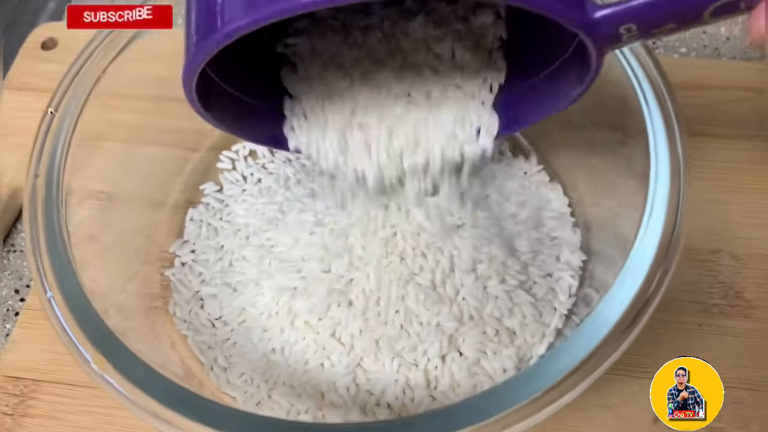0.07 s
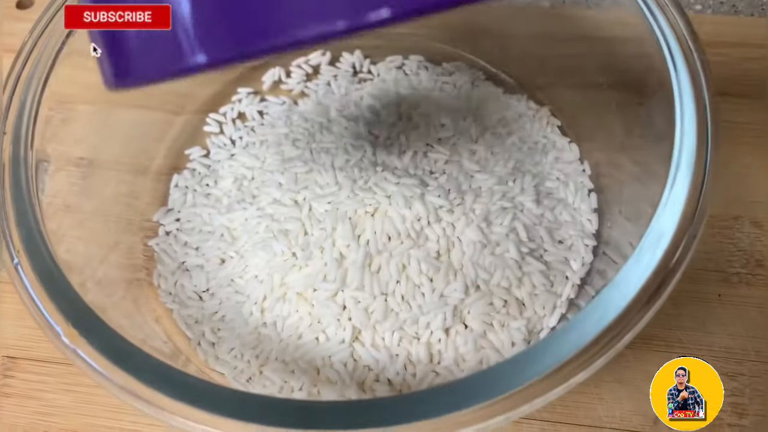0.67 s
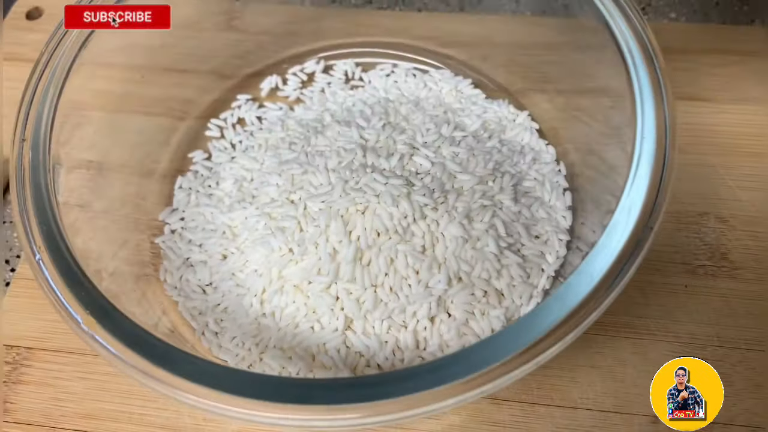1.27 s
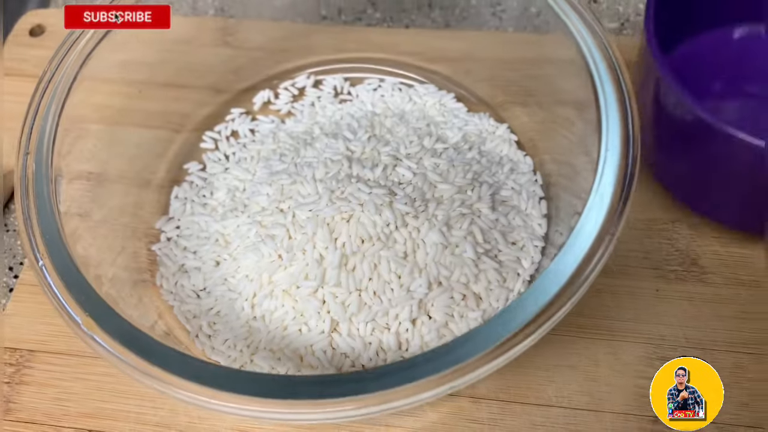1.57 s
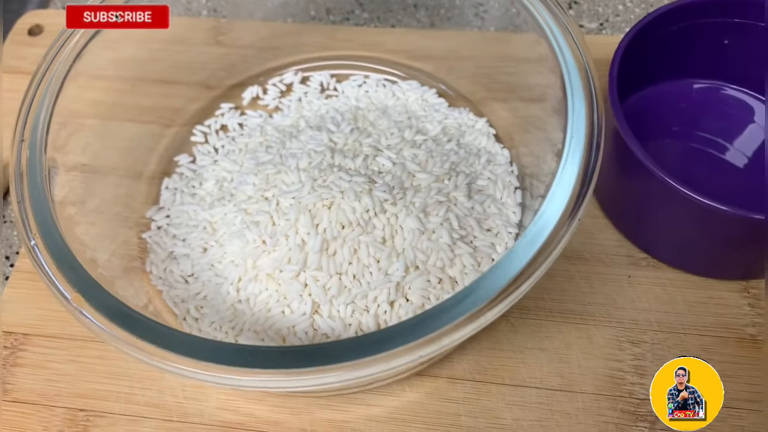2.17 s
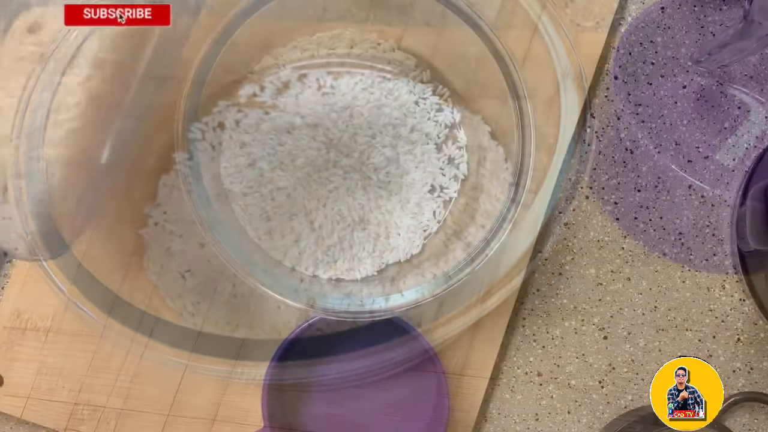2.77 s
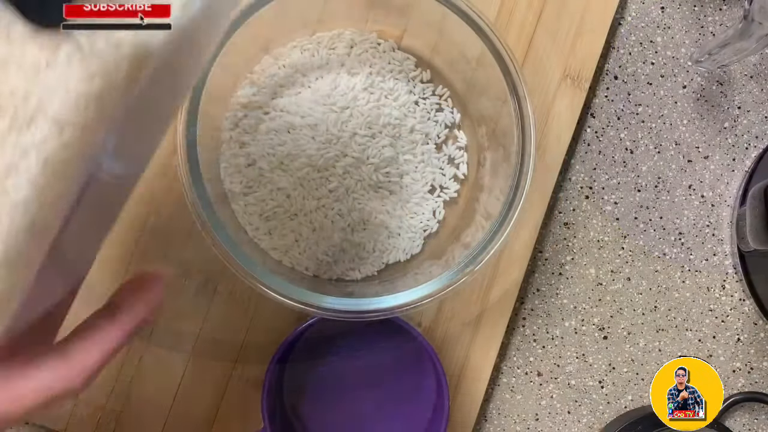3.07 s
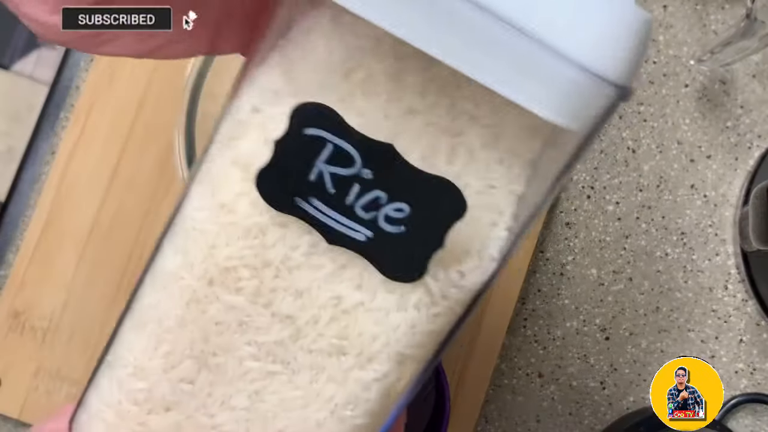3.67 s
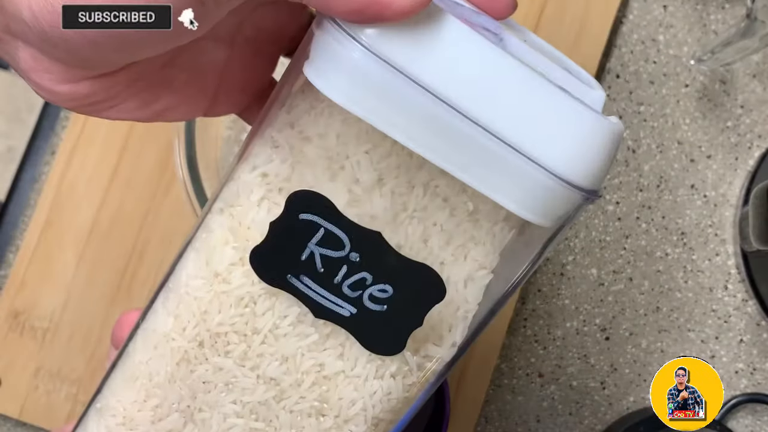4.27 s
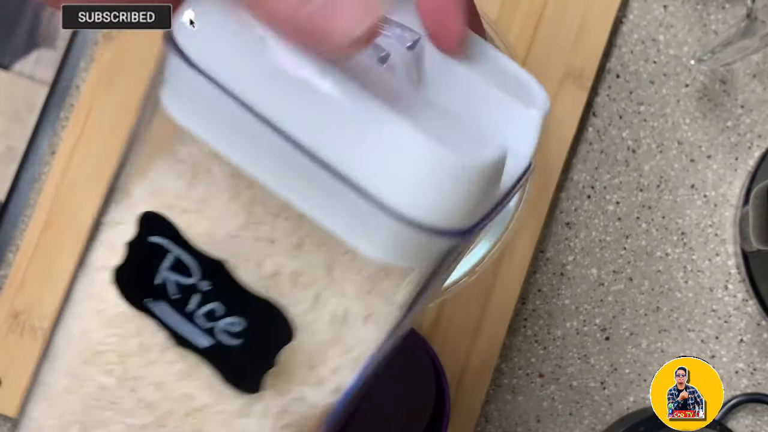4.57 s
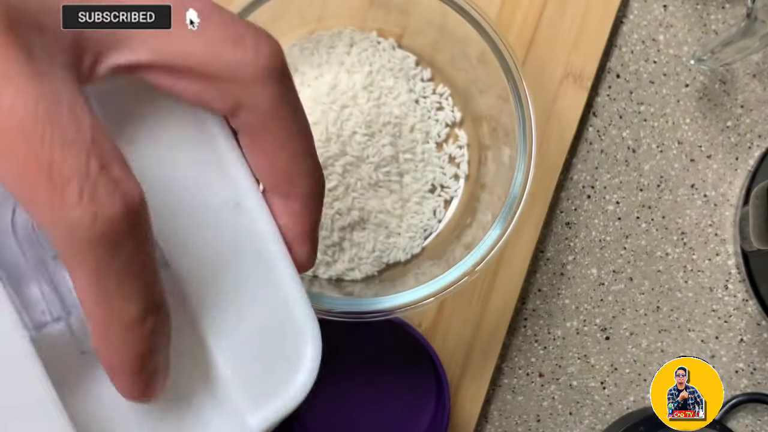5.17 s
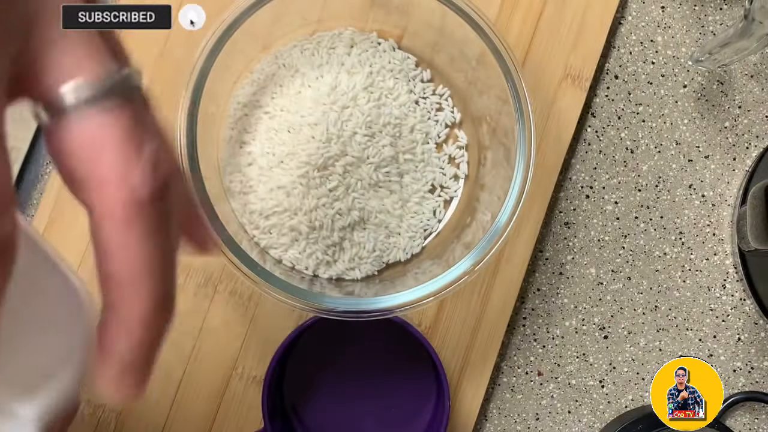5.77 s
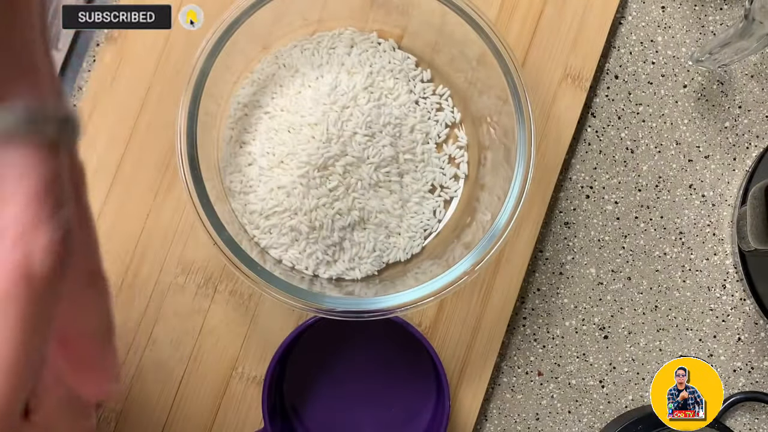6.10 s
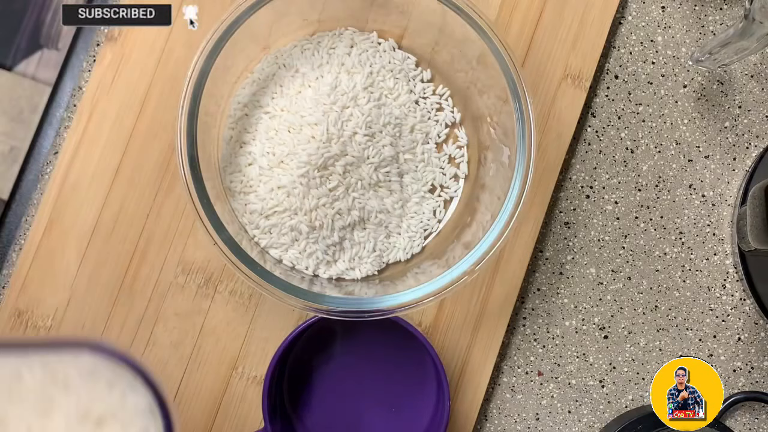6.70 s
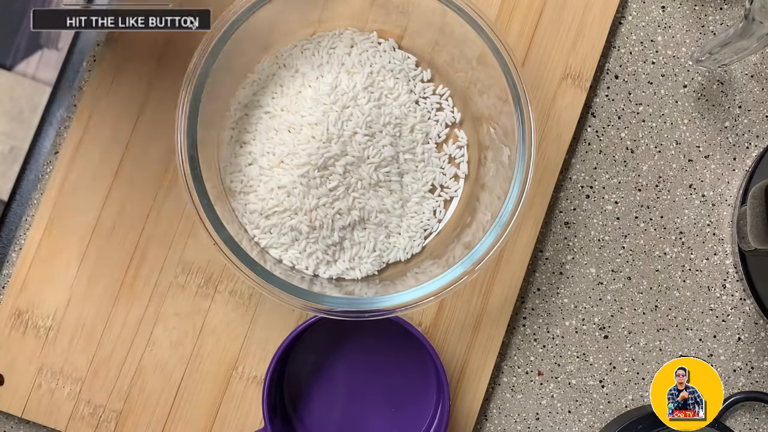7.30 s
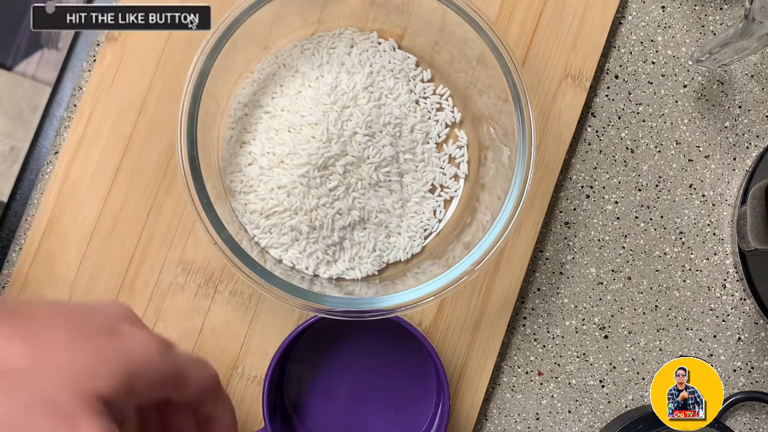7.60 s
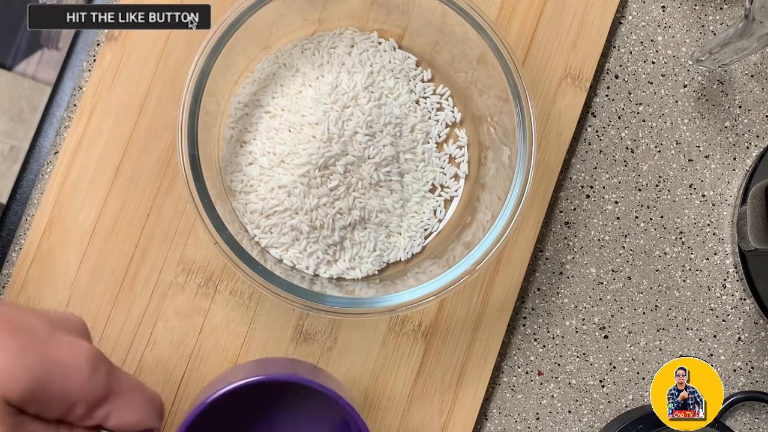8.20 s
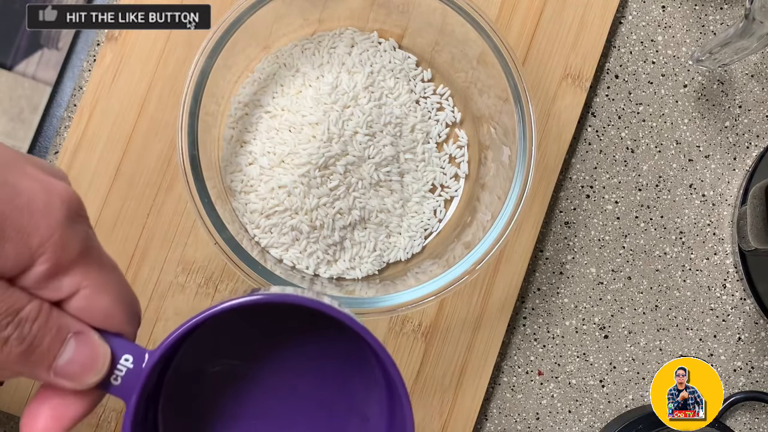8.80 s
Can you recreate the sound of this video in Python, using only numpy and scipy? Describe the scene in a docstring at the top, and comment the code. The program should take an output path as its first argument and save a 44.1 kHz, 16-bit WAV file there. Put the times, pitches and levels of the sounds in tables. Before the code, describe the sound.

Dry rice hisses into a glass bowl, then a plastic cup and canister knock and clatter, and more rice slides, in a quiet kitchen.

```python
"""Dry rice pours from a plastic measuring cup into a glass bowl, pattering and ringing the glass.
The cup is tapped and set down on a stone counter, where it totters. A plastic canister is lifted,
rice slipping along its wall, and put down; its lid is laid aside. Last, the cup knocks hollowly on
a wooden board as it is picked up, and the rice slides again. A small kitchen rumbles low throughout."""
import sys
import numpy as np
from scipy import signal
from scipy.fft import rfft, irfft
from scipy.io import wavfile

SR = 44100
rng = np.random.default_rng(int(sys.argv[2]) if len(sys.argv) > 2 else 0)


def transcribe(signal):
    """Save signal, clipped to [-1, 1], as a 16-bit WAV file at the path in sys.argv[1]."""
    frames = np.atleast_2d(signal).T
    limited = np.clip(frames, -1, 1)
    pcm = np.round(limited * 32767).astype(np.int16)
    wavfile.write(sys.argv[1], SR, pcm)


N = 399105

BOWL_LAG_SAMPLES, CANISTER_LAG_SAMPLES = -6.7, 13.1  # a positive lag puts the left ear behind the right, a negative one ahead of it

# Single grains landing. Each row: start in seconds, level in dB.
POUR_GRAINS = [(0.079, -31.5), (0.105, -29), (0.124, -30.5), (0.374, -32.5), (0.415, -32), (0.478, -39.5),
               (0.926, -68)]
# Rice patter. Each row: frequency in Hz, level in dB.
PATTER_SPECTRUM = [(200, -30.5), (450, -29), (800, -13), (1500, -12.5), (2500, -14.5), (4600, -10),
                   (6000, -6), (7000, -3.5), (8800, 4), (9700, -19.5), (10800, 7), (12500, 1.5), (14000, 0),
                   (15500, -17)]
# Glass bowl. Each row: frequency in Hz, level in dB, T60 in seconds.
BOWL_MODES = [(780, -9.5, 0.055), (1518, -15, 0.1), (2887, -3, 0.035), (3630, -10, 0.025),
              (4330, -4.5, 0.037), (5415, 2.5, 0.01), (6556, 9, 0.028), (6940, 11.5, 0.021),
              (8150, 2.5, 0.015)]


def pour():
    """A swelling stream of grains rings the glass; the last trickle only patters on the heap."""
    stream_end_s, stream_db_per_s, glass_db_per_s = 0.3975, 4.5, 8
    start_s, db = np.transpose(POUR_GRAINS)
    left_s = np.maximum(stream_end_s - np.arange(N) / SR, 0)
    stream = amp(-41.5 - stream_db_per_s * left_s) ** 2 * swell(0, stream_end_s, rise_s=1, stop_s=0.0094)
    trickle = amp(-53) ** 2 * swell(0, hold_s=0.53, rise_s=1, stop_s=0.07)
    hits = grains(np.sqrt(stream + trickle), per_s=1800, spread_db=1.5, t60_s=0.0049)
    hits += bursts(impulses(start_s, amp(db)), t60_s=0.0098)
    patter = amp(-1) * colour(hits, PATTER_SPECTRUM)
    on_glass = hits * np.sqrt(stream / (stream + trickle))
    glass = amp(-3.5 - glass_db_per_s * left_s) * through(on_glass, unit(ringing(BOWL_MODES)))
    return arrive(patter + glass, BOWL_LAG_SAMPLES), amp(-6.5) * patter + amp(-8) * glass


# Sharp ticks on the canister wall: single grains striking it, and at 3.05 s a light tap on the canister itself.
# Each row: start in seconds, level in dB.
WALL_TICKS = [(3.053, -43.5), (3.1366, -53), (3.284, -46.5), (3.687, -47), (3.7928, -34.5), (3.812, -31),
              (3.9417, -31.5), (4.083, -40), (4.504, -33), (4.583, -40), (5.0431, -39.5), (5.648, -36),
              (5.764, -34), (7.145, -56.5), (7.284, -52.5), (7.429, -56), (7.673, -35), (7.772, -37),
              (7.803, -27), (7.815, -30), (7.96, -34), (7.991, -31), (8.1676, -28), (8.21, -25),
              (8.272, -27.5), (8.4045, -25), (8.459, -30.5), (8.51, -33), (8.5649, -25), (8.6499, -29),
              (8.6849, -31), (8.709, -26), (8.8439, -23.5), (8.8766, -30), (8.935, -27), (8.957, -22)]
# Slips as the canister tips. Each row: start and hold in seconds, level in dB, rise in seconds.
RICE_SLIPS = [(3.098, 0.049, -58.5, 0.025), (3.264, 0.019, -63, .015), (3.435, 0.021, -67.5, 0.034),
              (3.684, 0.14, -60.5, 0.0055), (3.818, .17, -56, 0.0087), (4.075, 0.014, -62, .01),
              (4.48, 0.014, -50, 0.032), (4.591, 0.026, -58, 0.014), (4.623, 0.23, -70, .03),
              (4.965, 0.036, -54.5, 0.026), (5.19, 0.014, -64, 0.043), (5.334, .24, -64, 0.041),
              (5.61, 0.072, -50.5, 0.018), (5.723, 0.19, -61.5, 0.028), (7.676, 0.029, -46, .003),
              (7.795, 0.025, -67, 0.028), (7.945, .12, -61, 0.04)]
# Flow of the last slide. Each row: time in seconds, level in dB.
LONG_SLIDE = [(8.12, -43), (8.266, -41.5), (8.36, -43), (8.395, -48.5), (8.42, -44), (8.62, -48),
              (8.645, -50.5), (8.70, -46.5), (8.82, -45), (8.855, -39), (8.92, -45.5), (8.97, -44),
              (9.05, -47)]
# Grain hiss and wall wash. Each row: frequency in Hz, level in dB.
HISS_SPECTRUM = [(200, -47), (500, -32.5), (1000, -19.5), (2500, -18), (4400, -13.5), (6000, -10.5),
                 (8000, -4), (10300, 0), (13300, 4), (14500, 3), (16000, -4.5)]
WASH_SPECTRUM = [(400, -19.5), (1000, -2.5), (2500, -7), (3600, -4.5), (4500, 5.5), (5600, -1), (7600, 1),
                 (8600, -10), (12000, -6.5), (16000, -19)]
# Canister hollow. Each row: frequency in Hz, level in dB, T60 in seconds.
HOLLOW_MODES = [(238.3, -13, 0.24), (983, 9, 0.06), (4150, -11, 0.0039)]


def slide():
    """Rice slips along the canister wall in little avalanches and stirs its hollow body."""
    clumps_per_s, clump_db, wash_t60_s = 60, 2.5, 0.068
    slip_power = sum(amp(db) ** 2 * swell(start_s, hold_s, rise_s, stop_s=0.025)
                     for start_s, hold_s, db, rise_s in RICE_SLIPS)
    flow = np.sqrt(slip_power) + amp(0.5) * gain_curve(LONG_SLIDE)
    clump_index = np.arange(N) / SR * clumps_per_s
    clumps = amp(clump_db * np.interp(clump_index, np.arange(2000), rng.standard_normal(2000)))
    hits = amp(-1.5) * grains(flow * clumps, per_s=1700, spread_db=3.5, t60_s=0.0057)
    tick_s, tick_db = np.transpose(WALL_TICKS)
    ticks = amp(-7.5) * bursts(impulses(tick_s, amp(tick_db)), t60_s=0.014)
    hiss = colour(hits + ticks, HISS_SPECTRUM)
    # Hits all over the wall blur into a wash; its share grows with the flow.
    on_wall = hits * (flow / flow.max()) ** 0.1 + amp(-3) * ticks
    wall = np.array([bursts(on_wall, wash_t60_s) for _ in range(2)])
    wash = amp(-11) * colour(wall, WASH_SPECTRUM) / np.linalg.norm(fade(wash_t60_s))
    hollow = amp(-25.5) * through(hits + ticks, unit(ringing(HOLLOW_MODES)))
    return arrive(hiss + amp(-9.5) * hollow, CANISTER_LAG_SAMPLES) + wash, amp(-1.5) * hiss + hollow


# Plastic bodies. Each row: frequency in Hz, level in dB, T60 in seconds.
CUP_MODES = [(584.7, -14, 0.051), (812, -8.5, 0.1), (1222, -4, 0.1), (1393, -3, 0.075), (1507, 0.5, 0.15),
             (1690, -9, 0.13), (1960, -2.5, 0.14), (2110, 1, 0.25), (2175, -5.5, 0.15), (2260, -8, 0.067),
             (2780, -13, 0.11), (3700, -17.5, 0.05), (4380, -18.5, .09), (5220, -16, .06)]
CANISTER_MODES = [(348.4, -13, 0.032), (445.6, -1, 0.042), (601.5, -3.5, 0.065), (779, -21, 0.033),
                  (1106, -5.5, 0.05), (2280, -5, 0.08), (2618, -8.5, 0.037), (3390, -10.5, 0.033)]
# Their contact noise. Each row: frequency in Hz, level in dB.
CUP_DOWN_SPECTRUM = [(150, -36), (450, -30), (800, -13), (1500, 6), (2100, 1.5), (2800, -5), (4000, -15.5),
                     (8000, -41)]
CANISTER_SPECTRUM = [(100, -15), (300, -8.5), (550, 7.5), (900, 2.5), (1500, 0.5), (2400, 2), (4000, -7),
                     (8000, -46)]
CUP_UP_SPECTRUM = [(150, -9), (500, -17), (900, 0), (1300, 2.5), (2100, 2), (2800, -7), (4000, -20),
                   (8000, -40)]
# Blows. Each row: start in seconds, level in dB, wall pitch in Hz, clack in dB re that level,
# then thud, crack and surface ring in dB.
CUP_DOWN_KNOCKS = [(0.5572, -29, 1398, -12, -58, -30.5, -65.5), (0.8681, -51, 1448, -2, -70, -70.5, -83),
                   (1.4162, -19, 1948, 1.5, -70, -22, -82), (1.4265, -22, 2900, -1, -77.5, -28.5, -84),
                   (1.7656, -23, 1380, 14, -36, -65.5, -49), (1.8274, -8, 2068, 1, -20, -35.5, -34.5),
                   (2.0141, -15, 2050, -1, -33, -27, -40.5), (2.028, -23.5, 2053, 7.5, -49, -41.5, -58),
                   (2.054, -25, 1973, 10.5, -31, -38, -38), (2.065, -22, 1558, 6.5, -39.5, -27, -50.5),
                   (2.168, -24.5, 2140, 13, -45, -41.5, -54.5), (2.2422, -34, 1956, 4.5, -42, -44, -57),
                   (2.2629, -33, 2154, 6.5, -58.5, -49, -52.5)]
CANISTER_KNOCKS = [(3.052, -59, 2100, -2, -86.5, -56, -91), (3.188, -59.5, 1473, -9, -87, -63.5, -90.5),
                   (5.8105, -24, 460.2, 5.5, -22.5, -30, -34), (5.8208, -24, 572.7, -6, -42, -21, -55),
                   (5.8393, -13, 435.3, -6.5, -21.5, -17, -38), (6.096, -37, 634, -2.5, -45, -45.5, -64.5),
                   (6.148, -40, 642.7, 1.5, -45.5, -54, -74), (6.8735, -20.5, 842, -3.5, -48, -53.5, -56),
                   (6.933, -22.5, 900, -4, -43.5, -82.5, -62)]
CUP_UP_KNOCKS = [(7.746, -51, 1560, 6, -46.5, -53, -73), (7.782, -45, 2500, -6, -50, -54.5, -38),
                 (7.81, -45, 1530, -12, -49, -47.5, -67), (7.847, -38, 1300, -10, -33.5, -42, -62),
                 (7.858, -33.5, 1490, -2, -30.5, -67, -28.5), (7.874, -12, 1230, -7, -36, -62, -45),
                 (7.877, -36, 2625, 2.5, -44, -60, -42), (8.07, -13, 1855, -15, -36, -31.5, -56),
                 (8.1035, -19, 1138, -13, -37, -44, -57), (8.111, -28.5, 1570, 0, -31.5, -63, -31)]


def plastic_knocks():
    """Hard contacts: the cup tapped and set down, canister and lid put down, the cup picked up."""
    cup_down = blows(CUP_DOWN_KNOCKS, CUP_MODES, CUP_DOWN_SPECTRUM, BOWL_LAG_SAMPLES, pan_db=-1.5,
                     rise_s=0.00043, wall_t60_s=0.022, ring_db=-24.5, body_db=-9.5, body_t60_s=0.018,
                     thud_db=0.5, thud_t60_s=0.053, low_hz=136, crack_db=3, crack_t60_s=0.017,
                     room_db=-1)
    canister = blows(CANISTER_KNOCKS, CANISTER_MODES, CANISTER_SPECTRUM, CANISTER_LAG_SAMPLES, pan_db=2,
                     rise_s=0.00029, wall_t60_s=0.033, ring_db=-20, body_db=-9, body_t60_s=0.025,
                     thud_db=-2, thud_t60_s=0.07, low_hz=45, crack_db=2, crack_t60_s=0.0035,
                     room_db=-4.5)
    cup_up = blows(CUP_UP_KNOCKS, CUP_MODES, CUP_UP_SPECTRUM, CANISTER_LAG_SAMPLES, pan_db=1,
                   rise_s=0.00005, wall_t60_s=0.1, ring_db=-26.5, body_db=1, body_t60_s=0.014,
                   thud_db=-5.5, thud_t60_s=0.12, low_hz=35.03, crack_db=8.5, crack_t60_s=0.043,
                   room_db=0)
    return mix(cup_down, canister, cup_up)


# Surface below. Each row: frequency in Hz, level in dB, T60 in seconds.
SURFACE_MODES = [(118, -6.5, 0.25), (129, -3, 0.14), (245.2, -1.5, 0.3), (281.3, -4, 0.15),
                 (325.4, -7.5, 0.2)]
# Surface thud and contact crack. Each row: frequency in Hz, level in dB.
THUD_SPECTRUM = [(35, -25.5), (70, -2.5), (120, 0), (250, 0), (450, -5.5), (800, -11), (1600, -33.5),
                 (4000, -61.5)]
CRACK_SPECTRUM = [(800, -30), (2500, -2), (3600, 0.5), (5000, -4.5), (6500, -2), (9000, -6.5),
                  (12000, -1.5), (14000, -7), (16000, -28.5)]


def blows(rows, modes, spectrum, lag_samples, pan_db, rise_s, wall_t60_s, ring_db, body_db, body_t60_s,
          thud_db, thud_t60_s, low_hz, crack_db, crack_t60_s, room_db):
    """The struck wall clacks, the body rings, the surface below thuds and the contact cracks."""
    start_s, db, wall_hz, wall_db, *contact_db = np.transpose(rows)
    body_hits, thud_hits, crack_hits, surface_hits = (impulses(start_s, amp(level))
                                                      for level in (db, *contact_db))
    # Each blow lands elsewhere, so it takes its own share of each mode.
    shape = len(start_s), len(modes)
    shares = rng.choice([-1, 1], shape) * amp(2 * rng.standard_normal(shape))
    rings = shares @ np.array([amp(level + ring_db) * mode(hz, t60_s) for hz, level, t60_s in modes])
    onset = 1 - fade(np.log(1000) * rise_s)  # plastic gives
    wall, ring = np.zeros((2, N))
    for k, start in enumerate(np.round(start_s * SR).astype(int)):
        span = slice(start, start + len(onset))
        wall[span] += amp(db[k] + wall_db[k]) * onset * mode(wall_hz[k], wall_t60_s)
        ring[span] += amp(db[k]) * rings[k]
    body = ring + amp(body_db) * colour(bursts(body_hits, body_t60_s, rise_s), spectrum)
    thud = amp(thud_db) * colour(bursts(thud_hits, thud_t60_s, rise_s=0.0012), THUD_SPECTRUM)
    bass_cut = signal.butter(2, low_hz, "high", fs=SR, output="sos")  # light things move little bass
    surface = signal.sosfilt(bass_cut, thud + through(surface_hits, ringing(SURFACE_MODES)))
    crack = amp(crack_db) * colour(bursts(crack_hits, crack_t60_s, rise_s), CRACK_SPECTRUM)
    direct = wall + surface + arrive(body, lag_samples / 2) + arrive(crack, lag_samples)
    feed = wall / 4 + body + crack + amp(-3) * surface  # the wall is heard mostly close by
    return panned(pan_db) * direct, panned(pan_db) * amp(room_db) * feed


# Cup rebounds. Each row: start in seconds, pitch in Hz, note and overtone in dB.
CUP_REBOUNDS = [(1.7672, 1537, -27.5, -53.5), (2.3683, 1636, -64, -64.5), (2.474, 1615, -69.5, -69.5),
                (7.746, 1524, -50, -47.5), (7.849, 1537, -46, -43), (7.875, 1497, -23.5, -50),
                (8.1055, 1420, -40, -42)]


def rebounds():
    """Clear of the surface, the cup's wall rings on with a note and one overtone."""
    out = 0
    for start_s, hz, db, overtone_db in CUP_REBOUNDS:
        note = amp(db) * mode(hz, t60_s=0.21) + amp(overtone_db) * mode(2.635 * hz, t60_s=0.17)
        out = out + np.pad(note, (int(start_s * SR), N))[:N]
    return arrive(out, 0), amp(-13) * out


# Soft taps. Each row: start in seconds, level in dB, wall pitch in Hz.
CUP_TOTTERS = [(2.3684, -46, 1890), (2.388, -55.5, 2100), (2.412, -51.5, 2010), (2.452, -62.5, 2050),
               (2.474, -62, 1403), (2.5196, -56, 1480), (2.5355, -59.5, 2100)]
CANISTER_TAPS = [(5.568, -39, 350), (5.608, -38.5, 367.5), (5.648, -37, 393), (5.657, -40.5, 348.8),
                 (5.677, -46.5, 262.7), (5.759, -38, 434.3), (5.803, -16, 351.5), (5.846, -17, 169.7),
                 (7.798, -25, 135)]


def plastic_taps():
    """The cup totters to rest; the canister is handled."""
    cup = taps(CUP_TOTTERS, CUP_MODES, BOWL_LAG_SAMPLES,
               rise_s=0.001, wall_t60_s=0.07, ring_db=-12, room_db=-13.5)
    canister = taps(CANISTER_TAPS, CANISTER_MODES, CANISTER_LAG_SAMPLES,
                    rise_s=0.0022, wall_t60_s=0.032, ring_db=-14, room_db=-7)
    return mix(cup, canister)


def taps(rows, modes, lag_samples, rise_s, wall_t60_s, ring_db, room_db):
    """A soft contact draws a short note from the wall and a faint ring from the body."""
    onset = 1 - fade(np.log(1000) * rise_s)
    out = 0
    for start_s, db, hz in rows:
        note = mode(hz, wall_t60_s) + amp(ring_db) * ringing(modes)
        out = out + np.pad(amp(db) * note * onset, (int(start_s * SR), N))[:N]
    return arrive(out, lag_samples), amp(room_db) * out


# Rim scuffs. Each row: start and hold in seconds, object and surface level in dB.
CUP_ROCKS = [(1.98, 0.3, -51, -53), (2.19, 0.049, -49.5, -47.5), (2.345, 0.032, -58, -74),
             (2.44, 0.1, -74, -90.5)]
CANISTER_DRAGS = [(5.625, 0.03, -59.5, -55), (5.73, 0.1, -59.5, -60), (6.03, 0.11, -64, -63.5),
                  (6.875, 0.066, -44, -50), (6.96, 0.048, -54.5, -41)]
CUP_DRAGS = [(7.68, 0.054, -49, -70.5), (7.745, 0.029, -47, -48.5), (7.785, 0.033, -44, -46),
             (7.86, 0.033, -44, -37), (7.95, .02, -54.5, -53), (8.02, 0.077, -52.5, -54.5)]


def plastic_scuffs():
    """The cup rocks on its rim; canister, lid and cup drag briefly."""
    cup_down = scuffs(CUP_ROCKS, CUP_MODES, CUP_DOWN_SPECTRUM, BOWL_LAG_SAMPLES,
                      per_s=630, ring_db=-7, body_db=-6.5, grit_db=-9.5)
    canister = scuffs(CANISTER_DRAGS, CANISTER_MODES, CANISTER_SPECTRUM, CANISTER_LAG_SAMPLES,
                      per_s=890, ring_db=-14, body_db=-4, grit_db=-19.5)
    cup_up = scuffs(CUP_DRAGS, CUP_MODES, CUP_UP_SPECTRUM, CANISTER_LAG_SAMPLES,
                    per_s=270, ring_db=-10.5, body_db=-6, grit_db=-9.5)
    return mix(cup_down, canister, cup_up)


def scuffs(rows, modes, spectrum, lag_samples, per_s, ring_db, body_db, grit_db):
    """A moving rim sends a stream of small contacts into the object and the surface below."""
    power = sum(amp([[db], [surface_db]]) ** 2 * swell(start_s, hold_s, rise_s=0.003, stop_s=0.029)
                for start_s, hold_s, db, surface_db in rows)
    on_object, on_surface = np.sqrt(power)
    touches = grains(on_object, per_s, spread_db=2.5, t60_s=0.032)
    presses = grains(on_surface, per_s, spread_db=-0.5, t60_s=0.019)
    ring = amp(ring_db) * through(touches, unit(ringing(modes)))
    body = ring + amp(body_db) * colour(touches, spectrum)
    grit = amp(grit_db) * colour(touches, CRACK_SPECTRUM)
    thud = amp(-3.5) * colour(presses, THUD_SPECTRUM)
    surface = thud + amp(-4.5) * through(presses, unit(ringing(SURFACE_MODES)))
    direct = surface + arrive(body, lag_samples / 2) + arrive(grit, lag_samples)
    return direct, amp(-8) * (body + grit) + amp(-9.5) * surface


# Hand on canister. Each row: start and hold in seconds, level in dB, centre in Hz, width in octaves.
HAND_RUBS = [(3.542, 0.035, -72, 2275, 1.8), (5.455, 0.11, -73, 3450, 0.79), (6.442, .02, -83, 3030, .7)]


def rubs():
    """Skin slides on smooth plastic: a soft band of friction noise."""
    out = 0
    for start_s, hold_s, db, hz, octaves in HAND_RUBS:
        band = signal.butter(1, hz * 2 ** (np.array([-.5, .5]) * octaves), "band", fs=SR, output="sos")
        noise = signal.sosfilt(np.vstack([band, band]), rng.standard_normal(N))
        envelope = np.sqrt(swell(start_s, hold_s, rise_s=0.045, stop_s=0.03))
        out = out + amp(db) * noise / noise.std() * envelope
    return arrive(out, CANISTER_LAG_SAMPLES), amp(2) * out


# Reverberation. Each row: frequency in Hz, level in dB, T60 in seconds.
KITCHEN_REVERB = [(80, -6, 0.423), (247.9, -7.5, 0.61), (656, 8.5, 0.31), (2000, 2.5, 0.25),
                  (5000, 1.5, 0.26), (7700, -1, 0.1), (10600, -7.5, 0.09), (14800, -12, 0.29)]


def kitchen(feed, early_db=5, early_t60_s=0.063, size=24000, bands=10):
    """Quick reflections off bowl and counter, then a tail that dies band by band."""
    hz, db, t60_s = np.transpose(KITCHEN_REVERB)
    edges_hz = np.geomspace(40, 17000, bands + 1)
    early = amp(early_db) * unit(fade(early_t60_s))
    response = 0
    for low, high in zip(edges_hz, edges_hz[1:]):
        log_centre = np.log(low * high) / 2
        band = signal.butter(2, [low, high], "band", fs=SR, output="sos")
        noise = signal.sosfilt(band, rng.standard_normal((2, size)))
        tail = unit(fade(np.interp(log_centre, np.log(hz), t60_s)))
        response = response + noise * unit(early + tail) * amp(np.interp(log_centre, np.log(hz), db))
    return through(feed, np.pad(response, ((0, 0), (SR // 500, 0))))


# Room noise. Each row: frequency in Hz, level in dB.
RUMBLE_SPECTRUM = [(12, -64.5), (20, -34.5), (27, -35), (30, -17), (40, -5.5), (65, 2), (128, -9.5),
                   (161, -15.5), (238, -18.5), (352, -31), (500, -50), (650, -66), (1100, -120)]
AIR_SPECTRUM = [(300, -10), (600, -5.5), (1100, 3.5), (1700, -5.5), (2600, -18), (5000, -20.5),
                (10000, -22.5), (13500, -18.5), (16000, -34)]
HUSH_SPECTRUM = [(100, -10.5), (300, -3.5), (550, -2), (900, 2.5), (1400, -6.5), (2500, -30)]
# Its course. Each row: time in seconds, level in dB.
AIR_LEVEL = [(0, -70.5), (2.3, -74), (3.1, -73), (9.05, -70)]
HUSH_LEVEL = [(0, -85), (2.3, -94), (3.1, -72.5), (9.05, -72)]


def background():
    """Low rumble, alike in both ears, diffuse air noise and a dull hush that comes up near 3 s."""
    rumble = colour(rng.standard_normal(N) + amp(-9) * rng.standard_normal((2, N)), RUMBLE_SPECTRUM)
    air = colour(rng.standard_normal((2, N)), AIR_SPECTRUM)
    hush = colour(amp(-8) * rng.standard_normal(N) + rng.standard_normal((2, N)), HUSH_SPECTRUM)
    return amp(-58.5) * panned(-1) * rumble + gain_curve(AIR_LEVEL) * air + gain_curve(HUSH_LEVEL) * hush


def grains(flow, per_s, spread_db, t60_s):
    """Random contacts; a stronger flow brings more and harder ones."""
    chance = np.clip(per_s * np.sqrt(flow / flow.max()) / SR, 1e-3, 1)
    sizes = amp(spread_db * np.minimum(rng.exponential(1, N), 4))
    clicks = (rng.random(N) < chance) * sizes / np.sqrt(chance * np.mean(sizes ** 2))
    return bursts(flow * clicks, t60_s) / np.linalg.norm(fade(t60_s))


def bursts(clicks, t60_s, rise_s=0.00018):
    """Each click wakes a crowd of damped modes: a short noise that builds and dies."""
    decay_pole = np.exp(-2 * np.log(1000) / (t60_s * SR))
    rise_pole = np.exp(-1 / (rise_s * SR))
    feedback = np.convolve([1, -decay_pole], [1, -rise_pole])
    energy = signal.lfilter([1 - rise_pole], feedback, clicks ** 2 + 1e-24)
    return np.sqrt(energy) * rng.standard_normal(N)


def impulses(times_s, gains):
    """One click per contact."""
    out = np.zeros(N)
    out[np.clip(np.round(times_s * SR).astype(int), 0, N - 1)] = gains
    return out


def ringing(modes):
    """Impulse response of a body, its modes alternating in sign."""
    return sum((-1) ** k * amp(db) * mode(hz, t60_s) for k, (hz, db, t60_s) in enumerate(modes))


def mode(hz, t60_s, size=24000):
    """Damped sine."""
    return np.sin(2 * np.pi * hz * np.arange(size) / SR) * fade(t60_s, size)


def fade(t60_s, size=24000):
    """Exponential decay."""
    return np.exp(-np.log(1000) * np.arange(size) / SR / t60_s)


def swell(start_s, hold_s, rise_s, stop_s):
    """Power of a movement: builds up to start_s, holds, dies away."""
    t = np.arange(N) / SR - start_s
    return np.exp(-2 * np.maximum(-t / rise_s, (t - hold_s) / stop_s).clip(0, 20))


def gain_curve(rows):
    """Gain per sample from (s, dB) rows; silent before the first."""
    time_s, db = np.transpose(rows)
    return amp(np.interp(np.arange(N) / SR, time_s, db, left=-np.inf))


def colour(x, spectrum, size=4096):
    """Minimum-phase filter; white noise keeps its level."""
    hz, db = np.transpose(spectrum)
    grid_hz = np.maximum(np.arange(size // 2 + 1) * SR / size, 1)
    cepstrum = irfft(np.log(amp(np.interp(np.log(grid_hz), np.log(hz), db))))
    cepstrum[1:size // 2] *= 2
    cepstrum[size // 2 + 1:] = 0
    return through(x, unit(irfft(np.exp(rfft(cepstrum)))))


def through(x, response):
    """Causal convolution per channel."""
    x, response = (np.atleast_2d(part).astype(np.float32) for part in (x, response))
    return signal.oaconvolve(x, response, axes=-1)[:, :N]


def arrive(x, lag_samples):
    """Sound reaches the two ears a few samples apart."""
    offsets = np.arange(-24, 25)
    delays = np.sinc(offsets - np.array([[lag_samples], [-lag_samples]]) / 2) * np.kaiser(len(offsets), 2)
    return signal.oaconvolve(np.broadcast_to(x, (2, N)), delays, mode="same", axes=-1)


def panned(db):
    """Left and right gains for a level difference."""
    return amp(np.array([[db], [-db]]) / 2)


def amp(db):
    """Decibels to gain."""
    return 10 ** (np.asarray(db) / 20)


def unit(x):
    """Scale to unit energy."""
    return x / np.sqrt(np.sum(x ** 2, axis=-1, keepdims=True) + 1e-20)


def mix(*sources):
    """Sum (direct sound, room feed) pairs."""
    return tuple(map(sum, zip(*sources)))


def scene():
    """All sources, direct and through the kitchen, over the room noise."""
    direct, feed = mix(pour(), slide(), rubs(), rebounds(),
                       plastic_taps(), plastic_knocks(), plastic_scuffs())
    return direct + kitchen(feed) + background()


def record(dry, cutoff_hz=16000):
    """Steep low-pass."""
    return signal.sosfilt(signal.ellip(10, .2, 80, cutoff_hz, fs=SR, output="sos"), dry)


dry = scene()
out = record(dry)
transcribe(out)
```